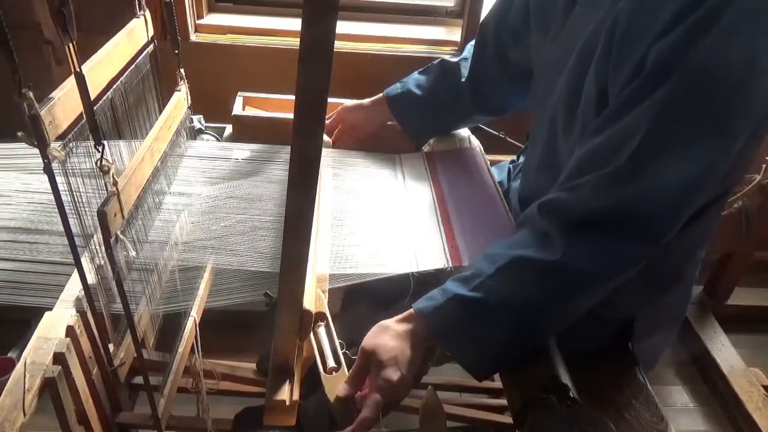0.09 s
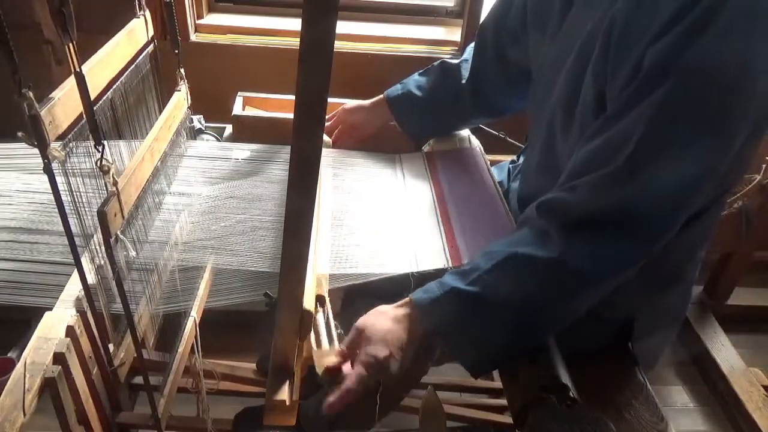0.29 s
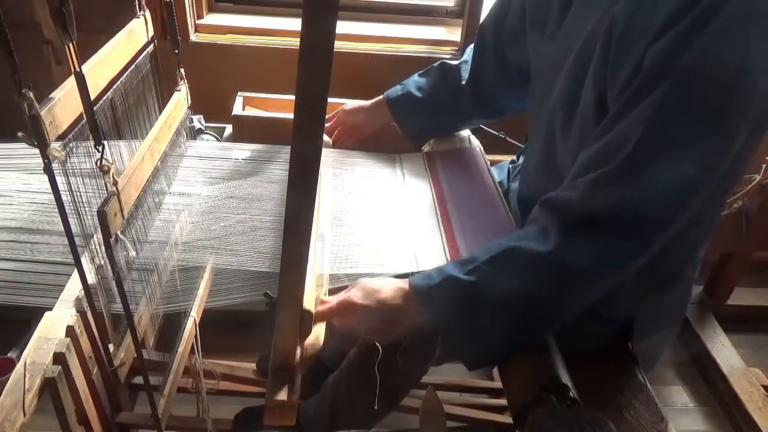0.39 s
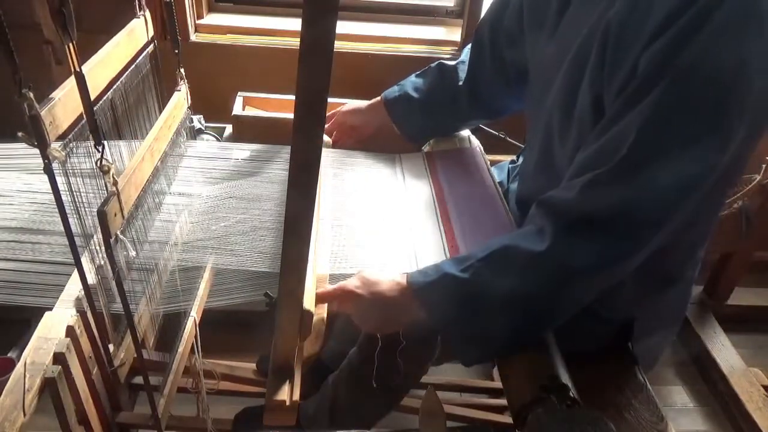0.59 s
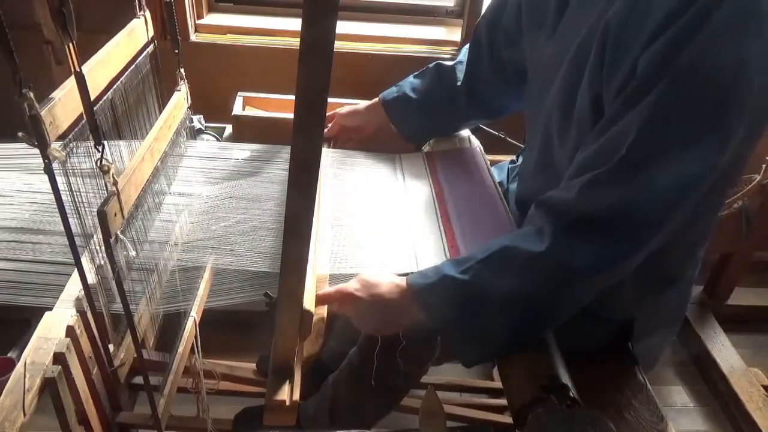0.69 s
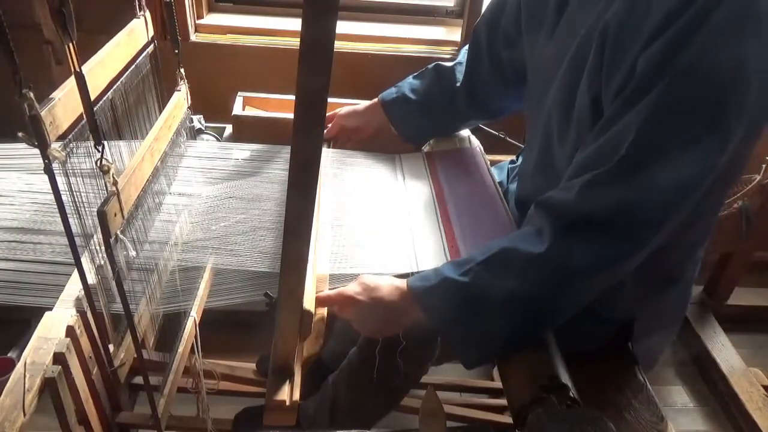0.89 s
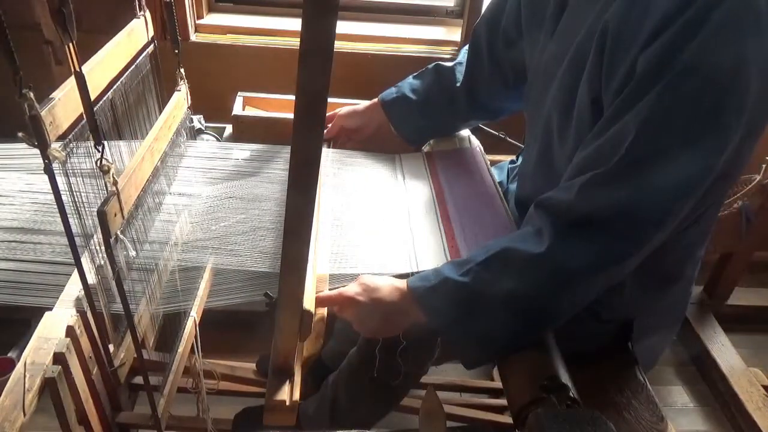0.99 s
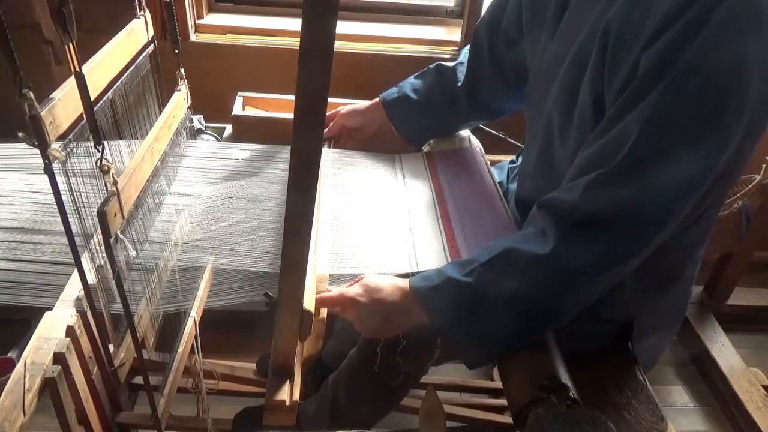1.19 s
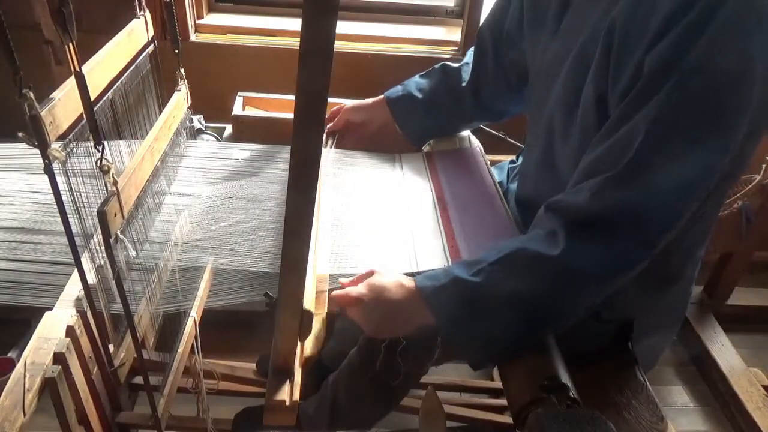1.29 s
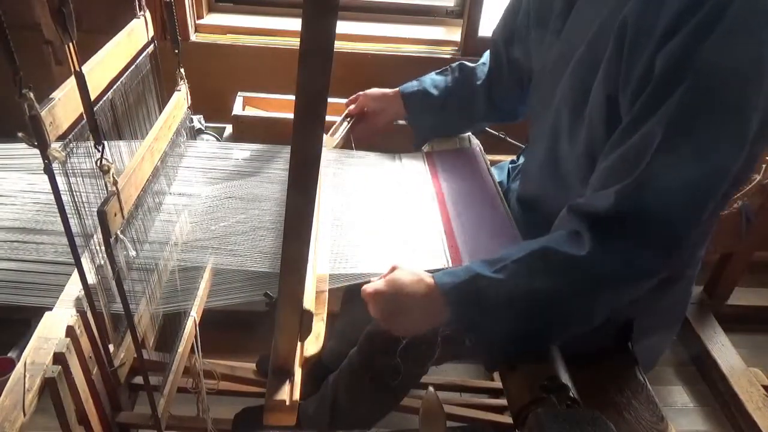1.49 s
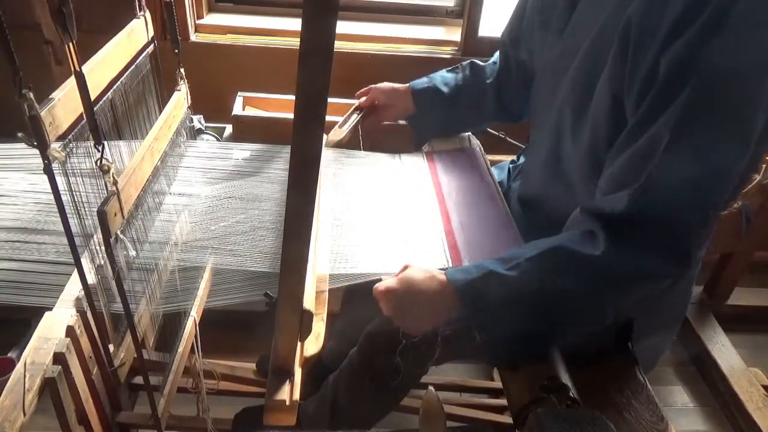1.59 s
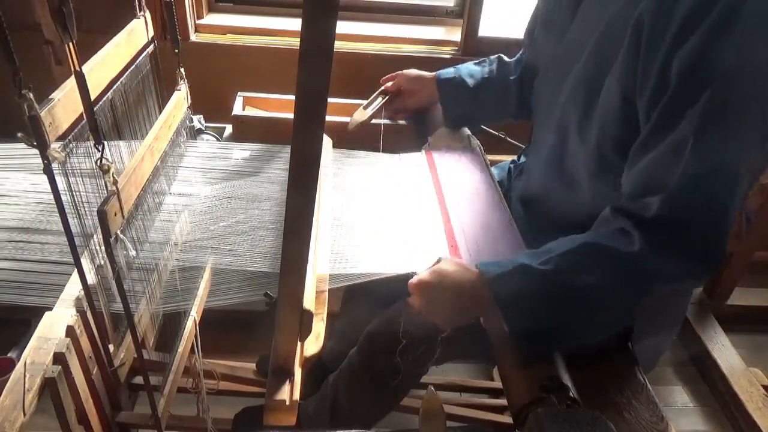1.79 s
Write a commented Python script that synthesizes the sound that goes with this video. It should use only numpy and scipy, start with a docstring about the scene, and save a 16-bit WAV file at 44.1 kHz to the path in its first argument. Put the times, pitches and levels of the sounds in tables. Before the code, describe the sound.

A shuttle thrown across a wooden handloom, loud clattering knocks, then rattling and softer catching clicks

```python
"""Shuttle on a handloom

Close by, a shuttle is thrown across a wooden handloom: ringing knocks, a dense clatter along the race and a
short chatter of the nose. The loose bobbin rattles on its spindle (jolted resonances), the frame rumbles
under it (soft jolts through low ones) and the yarn rustles (shaped noise). Later the shuttle is caught and
clicks in the hand. A small workshop answers with noisy decaying tails, over air noise and a motor's hum.
"""
import sys
import numpy as np
from scipy import signal
from scipy.fft import rfft, irfft, next_fast_len
from scipy.io import wavfile

SR = 44100
rng = np.random.default_rng(int(sys.argv[2]) if len(sys.argv) > 2 else 0)


def ratio_of_db(decibels):
    """Turn decibels (scalar or array-like) into linear amplitude factors; 0 dB maps to 1."""
    return 10 ** (np.asarray(decibels, float) / 20)


def unload_wav(signal):
    """Save mono or channel-first audio to the path in sys.argv[1] as 16-bit WAV at rate SR, clipped to [-1, 1]."""
    wavfile.write(
        sys.argv[1],
        SR,
        np.round(np.clip(np.atleast_2d(signal).T, -1, 1) * 32767).astype(np.int16),
    )


N = 79380  # 1.8 s


def along(points, hz):
    """Interpolates (Hz, value) points on a log frequency axis."""
    f, v = np.transpose(points)
    return np.interp(np.log(hz + 1), np.log(f + 1), v)


def unit(x):
    """Scales to rms 1."""
    return x / np.sqrt(np.mean(x ** 2) + 1e-20)


def curve(rows, axis=1):
    """One dB column drawn out per sample, -120 dB outside its times."""
    rows = np.array(rows)
    return np.interp(np.arange(N) / SR, rows[:, 0], rows[:, axis], -120, -120)


def filtered(x, response):
    """Multiplies the spectrum of x by a complex response of frequency."""
    m = next_fast_len(N + SR // 2)
    return irfft(rfft(x, m) * response(np.fft.rfftfreq(m, 1 / SR)), m)[..., :N]


def body(peaks):
    """Response of a resonant body: a causal sum of (Hz, width Hz, dB) modes of alternating sign."""
    def response(f):
        total = 0
        for k, (c, w, db) in enumerate(peaks):
            total = total + (-1) ** k * ratio_of_db(db) * 1j * f * w / (c * c - f * f + 1j * f * w)
        return total
    return response


def taps(per_s, spread_db):
    """Impulses at random times, of uneven size and random sign."""
    u, size = rng.random((2, N)), rng.standard_normal(N)
    return (u[0] < per_s / SR) * ratio_of_db(spread_db * size) * np.sign(u[1] - .5)


def scatter(ring, t60):
    """Sets a ring off again and again during a short contact that dies away in t60 seconds."""
    t = np.arange(SR // 50) / SR
    contacts = unit(rng.standard_normal(len(t)) * ratio_of_db(-60 * t / t60)) / np.sqrt(len(t))
    return signal.fftconvolve(ring, contacts)[:len(ring)]


def add(out, s, x):
    """Mixes x into out at time s."""
    i = int(round(s * SR))
    out[i:i + len(x)] += x[:N - i]


def clacks():
    """Each knock rings the modes near its body and edge pitches, under a sharp crack and a short noisy tail."""
    # knocks of the shuttle: t/s, peak level/dB, body f/Hz, edge f/Hz, edge over body level/dB
    knocks = [(0.0442, -25, 2400, 5030, -3.5), (0.2267, -22, 2650, 5060, -47),
              (0.2374, -17, 2640, 5200, -24), (0.243, -8.5, 3460, 5050, -14),
              (0.2544, -6.5, 4300, 5000, -15), (0.265, -1, 4350, 5720, 19), (0.289, -27, 4150, 6300, -22),
              (0.3082, -8, 2360, 6900, -2.5), (0.3314, -7.5, 3340, 5000, -1),
              (0.3365, -13.5, 2620, 5270, 6), (0.3563, -4, 2970, 5260, 9), (0.374, -7.5, 4800, 5090, -19),
              (0.3786, -4, 2900, 5700, -2.5), (0.4183, -1, 4050, 8100, 4), (0.4259, -2.5, 3330, 6530, -2.5),
              (0.4423, -4.5, 4150, 6500, -10.5), (0.4628, -0.5, 4120, 7540, -26),
              (0.4854, -4.5, 4270, 5180, -5), (0.4966, 1, 3250, 6700, -6), (0.5598, -3, 3310, 5120, -8.5),
              (0.5821, -2.5, 3000, 5330, -3), (0.6715, -13.5, 3430, 6500, -15),
              (1.1249, -32, 3950, 5290, -38), (1.148, -31.5, 4150, 5200, -24),
              (1.185, -31.5, 2480, 7750, -31), (1.3524, -23, 2960, 6100, -7),
              (1.3914, -11.5, 3330, 7240, -11.5), (1.413, -18.5, 3380, 6070, -8),
              (1.4391, -20.5, 3050, 4900, 0), (1.4564, -16, 3320, 7540, -13), (1.486, -23, 4270, 8200, -14),
              (1.5097, -30, 7100, 9500, -9), (1.6772, -26, 4760, 2090, -8)]
    # modes of the shuttle: f/Hz, level/dB, t60/s
    shuttle_modes = [(1866, 7.5, 0.046), (2095, 1, 0.054), (2425, 1, 0.052), (2818, 2.5, 0.032),
                     (2960, -3, 0.11), (3330, 0.5, 0.028), (4250, -23, 0.034), (4800, -5.5, 0.047),
                     (5200, 0, 0.043), (5910, 2.5, 0.037), (6890, 8, 0.025), (7140, 4, 0.023),
                     (7600, 2, 0.038), (8300, 0.5, 0.04), (10820, 7.5, 0.059)]
    focus_oct, crack_steep = 0.38, 1.54  # how closely ring and crack keep to the two pitches
    ring_db, crack_db, tail_db = -9, -10, -22
    contact_t60_s, crack_t60_s, tail_t60_s = 0.0071, 0.0037, 0.14
    low_share = 0.34  # a knock radiates little below this share of its body pitch
    out, t = np.zeros(N), np.arange(SR // 8) / SR
    hz, mode_db, t60 = np.transpose(shuttle_modes)[:, :, None]
    f = np.fft.rfftfreq(len(t), 1 / SR) + 1

    for s, db, body_hz, edge_hz, edge_db in knocks:
        def near(g):
            at_body = 1 / (1 + (np.log2(g / body_hz) / focus_oct) ** 2)
            at_edge = 1 / (1 + (np.log2(g / edge_hz) / focus_oct) ** 2)
            return at_body + ratio_of_db(edge_db) * at_edge

        r = rng.standard_normal((2, len(hz), 1))
        decay = ratio_of_db(mode_db + 2 * r[0] - 60 * t / t60)
        detuned_hz = hz * (1 + 0.00904 * r[1])
        ring = np.sum(near(hz) * decay * np.sin(2 * np.pi * detuned_hz * t), 0)
        ring = scatter(ring, contact_t60_s)
        hiss = unit(irfft(rfft(rng.standard_normal(len(t))) * near(f) ** crack_steep, len(t)))
        crack = hiss * (ratio_of_db(crack_db - 60 * t / crack_t60_s) + ratio_of_db(tail_db - 60 * t / tail_t60_s))
        onset = 1 - np.exp(-t / 0.0001)
        knock = (ratio_of_db(ring_db) * ring / np.abs(ring).max() + crack) * onset
        low_cut = (1j * f / (low_share * body_hz + 1j * f)) ** 4
        knock = irfft(rfft(knock) * low_cut, len(t))
        add(out, s, ratio_of_db(db) * knock / np.abs(knock).max())
    return out


def clatter():
    """Dense tiny contacts, each a damped sine of random pitch, coloured by the race board."""
    # clatter on the race: t/s, relative level/dB
    race_levels = [(0.19, -44), (0.218, -51), (0.242, -29.5), (0.268, -13.5), (0.28, -24), (0.3, -20),
                   (0.31, -10), (0.32, -25), (0.376, -9.5), (0.5, -16), (0.55, -19.5), (0.562, -21.5),
                   (0.608, -35), (0.616, -16.5), (0.652, -26.5), (0.776, -59.5), (0.81, -33), (0.86, -73)]
    # colour of the race board: f/Hz, relative level per Hz/dB
    race_colour = [(350, -44), (600, 9), (1050, -14.5), (1270, -6), (2170, -9.5), (2610, -1.5), (3740, -8),
                   (5090, -2.5), (10700, -15.5), (11500, -23), (15000, -50), (22000, -120)]
    per_s, spread_db, cycles, trim_db = 4500, 2.5, 40, -5
    begin, end = race_levels[0][0], race_levels[-1][0]
    u, size = rng.random((4000, 2)), rng.standard_normal((4000, 1))
    start = np.cumsum(-np.log(u[:, 0] + 1e-9)) / per_s + begin
    hz = 700 + 10800 * u[:, 1:2]
    t = np.arange(500) / SR
    damping_db = 60 * t * (hz + 3000) / (3 * cycles)  # higher contacts die sooner
    level_db = spread_db * size + along(race_colour, hz) - damping_db
    grains = ratio_of_db(level_db) * np.sqrt(hz + 3000) * np.sin(2 * np.pi * hz * t)
    at = (start[:, None] * SR).astype(int) + np.arange(len(t))
    x = np.bincount(at.ravel(), grains.ravel(), N)[:N]
    span = slice(int(begin * SR), int(end * SR))
    return x / np.std(x[span]) * ratio_of_db(curve(race_levels) + trim_db)


def chatter():
    """The nose skips over the threads in a quick run of bumps that swells and fades, ringing two modes."""
    # ring of the shuttle nose: f/Hz, width/Hz, level/dB
    nose_modes = [(2886, 110, 0), (3230, 67, -3.5)]
    begin_s, end_s, bumps_per_s, level_db = .578, .645, 100, -20
    u = rng.standard_normal((40, 2))
    s = begin_s + (np.arange(len(u)) + 0.099 * u[:, 0]) / bumps_per_s
    swell = np.sin(np.pi * np.clip((s - begin_s) / (end_s - begin_s), 0, 1)) ** 0.94
    bumps = np.bincount((s * SR).astype(int), swell * ratio_of_db(2 * u[:, 1]), N)
    x = filtered(bumps, body(nose_modes))
    return ratio_of_db(level_db) * x / np.std(x[int(begin_s * SR):int(end_s * SR)])


def bobbin():
    """Random rattling, each jolt catching one resonance, and single harder ticks, all on the same spindle."""
    # bobbin on its spindle: f/Hz, width/Hz, level/dB
    spindle_modes = [(1674, 85, -9.5), (1960, 87, -6.5), (3050, 67, -13.5), (3700, 83, -12), (4014, 69, -6),
                     (4270, 85, -4), (4750, 122, -14.5), (5020, 124, -11.5), (6340, 130, -12.5),
                     (6590, 140, -7.5), (6770, 133, -6.5), (8800, 160, -26)]
    # rattle: t/s, level/dB
    rattle_levels = [(.5, -70), (.56, -27), (.68, -33.5), (.775, -43), (.8, -38.5), (.85, -43.5),
                     (.875, -65.5), (1.25, -69), (1.264, -40.5), (1.37, -40.5), (1.4, -59), (1.5, -82)]
    # single ticks: t/s, relative level/dB, brightest f/Hz
    hard_ticks = [(0.6461, -6.5, 6530), (0.7908, -16, 6900), (0.8028, -18.5, 4220), (0.812, -13, 1900),
                  (0.8306, -17, 6660), (0.8445, -21, 1960), (0.907, -16.5, 1960), (0.9284, -22.5, 1960),
                  (1.2603, -14, 7060), (1.2744, -19, 5340), (1.2834, -20, 4130), (1.295, -37, 1950),
                  (1.3288, -18, 3000)]
    jolts_per_s, jolt_spread_db = 190, 5  # for each resonance
    trim_db, scatter_db, focus_oct, contact_t60_s = -10, 1.6, 0.54, 0.032  # of the ticks
    rattle = sum(filtered(taps(jolts_per_s, jolt_spread_db), body([mode])) for mode in spindle_modes)
    out = unit(rattle) * ratio_of_db(curve(rattle_levels))
    t = np.arange(SR // 8) / SR
    hz, width, mode_db = np.transpose(spindle_modes)[:, :, None]
    for s, db, bright_hz in hard_ticks:
        r = rng.standard_normal((len(hz), 1))
        near = 1 / (1 + (np.log2(hz / bright_hz) / focus_oct) ** 2)
        decay = ratio_of_db(mode_db + scatter_db * r) * np.exp(-np.pi * width * t)
        ring = np.sum(near * decay * np.sin(2 * np.pi * hz * t), 0)
        add(out, s, ratio_of_db(db + trim_db) * scatter(ring, contact_t60_s))
    return out


def frame():
    """Soft jolts ring the beams low down and the box above, in three bands that swell separately."""
    # beams: f/Hz, width/Hz, level/dB
    beam_modes = [(147, 30, 10.5), (166, 33, 19.5)]
    # box: f/Hz, width/Hz, level/dB
    box_modes = [(289, 52, -3.5), (359.5, 84, 3), (464.7, 35.6, 7.5), (546, 57, 6), (780, 25, 4),
                 (1085, 120, 9.5), (1377, 9, 6)]
    # shaking: t/s, beam level/dB, lower box level/dB, upper box level/dB
    shake_levels = [(0.0, -84, -60.5, -76), (0.064, -52, -51.5, -52.5), (0.174, -59, -65.5, -73),
                    (0.224, -53, -43, -43), (0.26, -46.5, -45, -41.5), (0.284, -58, -46, -65),
                    (0.34, -38, -31.5, -24), (0.41, -43, -30.5, -38), (0.44, -52, -35, -30),
                    (0.47, -46.5, -33, -49), (0.51, -44, -35.5, -27.5), (0.606, -45, -31, -46),
                    (0.63, -38.5, -30, -25.5), (0.656, -46.5, -44, -49), (0.676, -44, -40, -30),
                    (0.766, -62.5, -56.5, -75), (0.952, -68, -58.5, -66), (1.1, -66, -82, -69.5),
                    (1.19, -47.5, -48, -53), (1.225, -47.5, -58, -77), (1.258, -49, -44.5, -66),
                    (1.35, -45.5, -53.5, -62), (1.432, -59.5, -68, -64.5), (1.564, -66, -65, -67),
                    (1.8, -52, -67, -79)]
    jolts_per_s, jolt_spread_db = 900, 7.5
    out = 0
    for k, modes in enumerate([beam_modes, box_modes[:4], box_modes[4:]]):
        def softened(f):
            low_cut = 1j * f / (modes[0][0] / 2 + 1j * f)
            return body(modes)(f) * (low_cut / (1 + 1j * f / 1500)) ** 2

        rumble = unit(filtered(taps(jolts_per_s, jolt_spread_db), softened))
        out = out + rumble * ratio_of_db(curve(shake_levels, axis=k + 1))
    return out


def rustle():
    """Yarn drawn through the warp: fine noise with a little grain."""
    # rustle: t/s, level/dB
    rustle_levels = [(0, -53), (.04, -61), (.2, -55.5), (.9, -61), (1.0, -62), (1.115, -58.5),
                     (1.13, -49.5), (1.3, -45.5), (1.55, -49), (1.68, -48), (1.8, -49)]
    # colour of the yarn: f/Hz, relative level per Hz/dB
    yarn_colour = [(290, -29), (500, -22), (768, 4), (1060, 1), (1280, 4), (1470, 7.5), (5130, 10),
                   (11200, 8), (14600, -27), (22000, -120)]
    x = rng.standard_normal(N) + 0.5 * taps(670, 3)
    return unit(filtered(x, lambda f: ratio_of_db(along(yarn_colour, f)))) * ratio_of_db(curve(rustle_levels))


def room(x):
    """The workshop's answer: noise tails decaying by pitch, about 3 ms late, drawn anew every tenth of a second."""
    # decay of the workshop: f/Hz, t60/s
    decay_times = [(200, 0.28), (2000, 0.44), (10000, 0.12)]
    # width of its answer: f/Hz, side over middle level/dB
    side_levels = [(60, -5), (250, -11), (700, -11), (2800, -20), (6000, -9.5), (11000, -2.5)]
    out, step, delay = np.zeros((2, N + SR)), SR // 10, 130
    for i in range(0, N, step):
        hz, t, z = signal.stft(rng.standard_normal((2, SR // 3)), SR, nperseg=256)
        decay = ratio_of_db(-60 * t / along(decay_times, hz)[:, None])
        tail = signal.istft(z * decay, SR, nperseg=256)[1]
        wet = signal.fftconvolve(x[None, i:i + step], tail / np.linalg.norm(tail[0]), axes=1)
        out[:, i + delay:i + delay + wet.shape[1]] += wet
    mid = out[0, :N]
    side = filtered(out[1, :N], lambda f: ratio_of_db(along(side_levels, f)))
    return np.array([mid + side, mid - side])


def air():
    """Workshop background: shaped noise, mostly central, with the wavering hum of a distant motor."""
    # colour of the air: f/Hz, relative level per Hz/dB
    air_colour = [(12, -36), (20, -3.5), (163, -3.5), (243, -6.5), (585, -7), (1140, -10), (2210, -13.5),
                  (5760, -18), (10600, -42), (11500, -18), (15000, -67), (22000, -120)]
    # hum of the motor: f/Hz, relative level/dB
    hum_tones = [(83, -65), (166, -72)]
    air_db, side_db = -57.5, -9.5  # middle level, side over middle
    noise = unit(filtered(rng.standard_normal((2, N)), lambda f: ratio_of_db(along(air_colour, f))))
    mid, side = noise * ratio_of_db([[air_db], [air_db + side_db]])
    t = np.arange(N) / SR
    for hz, db in hum_tones:
        waver_db = 1 + 1.1 * np.sin(2 * np.pi * 4.1 * t + hz)
        mid = mid + ratio_of_db(db + waver_db) * np.sin(2 * np.pi * hz * t)
    return np.array([mid + side, mid - side])


def scene():
    """The loom in the middle, its small contacts radiating little bass, with the workshop around it."""
    contact_low_hz, room_db = 750, -9.5
    contacts = clacks() + clatter() + chatter() + bobbin()
    contacts = filtered(contacts, lambda f: (1j * f / (contact_low_hz + 1j * f)) ** 3)
    loom = contacts + frame() + rustle()
    return loom + ratio_of_db(room_db) * room(loom) + air()


def roll_off(x):
    """The treble ends steeply here."""
    return signal.sosfilt(signal.butter(12, 12370, fs=SR, output="sos"), x)


def record(dry):
    """Soft saturation, then a microphone pair with its own left-right lean and a steep top limit."""
    # lean of the microphone pair: f/Hz, left minus right level/dB
    pair_lean = [(40, -3), (170, 2.5), (330, 2.3), (600, 0.1), (4000, 0.5), (11800, 0.5)]
    ceiling, top_hz = .62, 11067
    saturated = dry / (1 + np.abs(dry / ceiling) ** 4) ** (1 / 4)

    def microphones(f):
        lean = ratio_of_db(along(pair_lean, f) * np.array([[.5], [-.5]]))
        faint_shelf = ratio_of_db(-55) * (f > top_hz)
        return lean * (1 / (1 + (f / top_hz) ** 90) + faint_shelf)

    mix = filtered(saturated, microphones)
    return roll_off(mix)


dry = scene()
out = record(dry)
unload_wav(out)
```